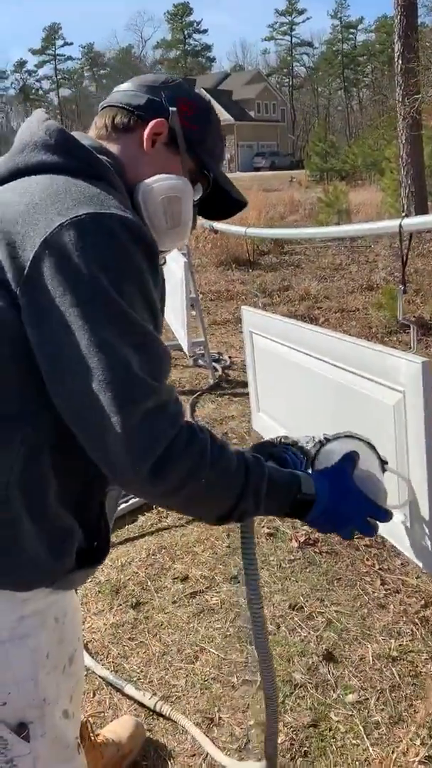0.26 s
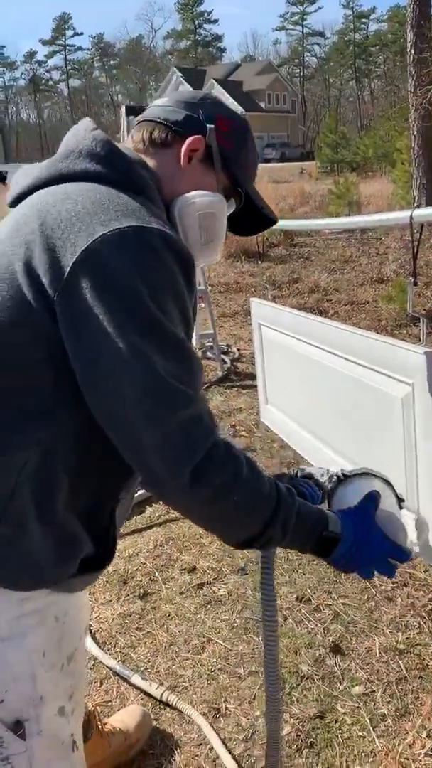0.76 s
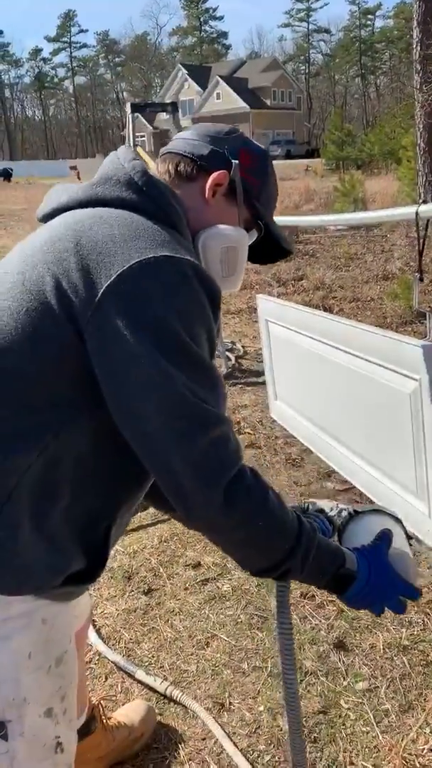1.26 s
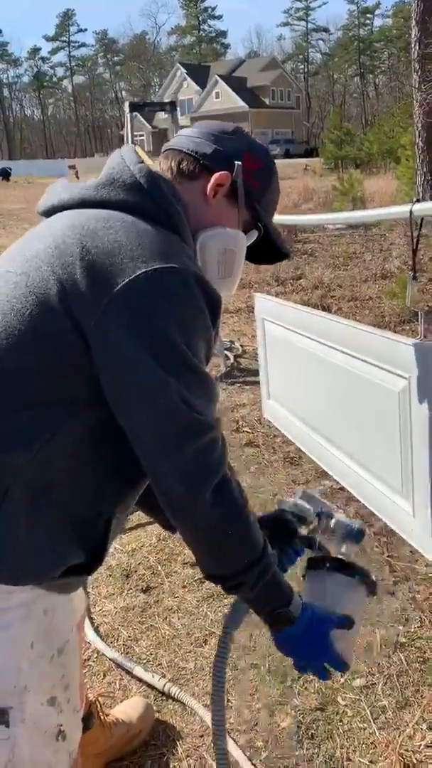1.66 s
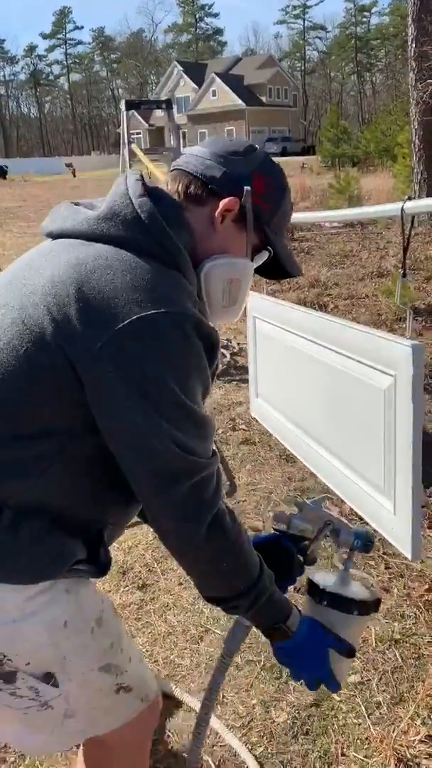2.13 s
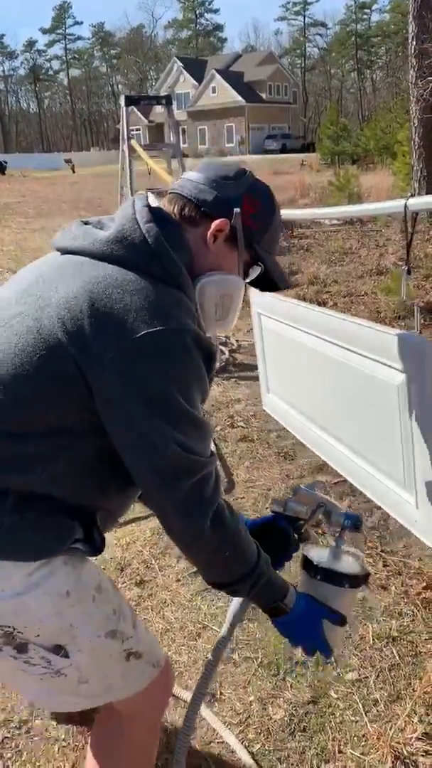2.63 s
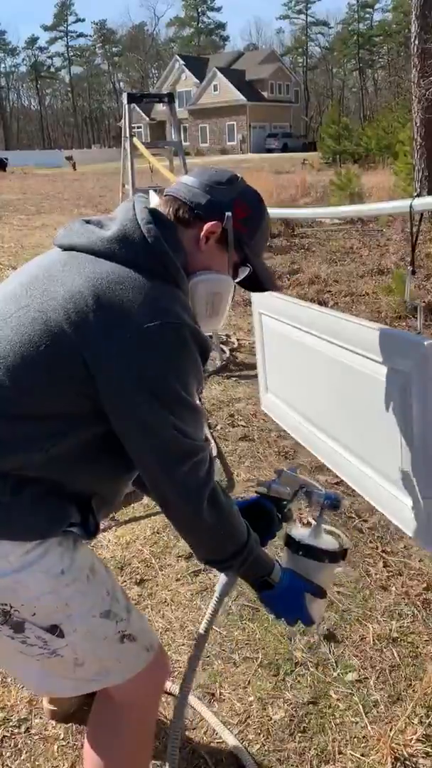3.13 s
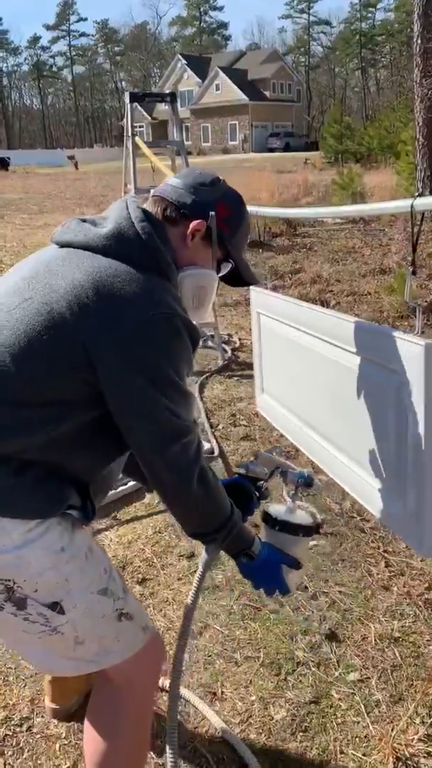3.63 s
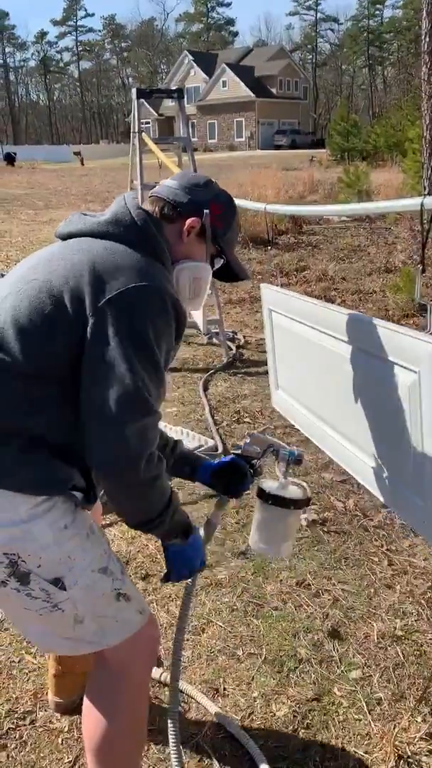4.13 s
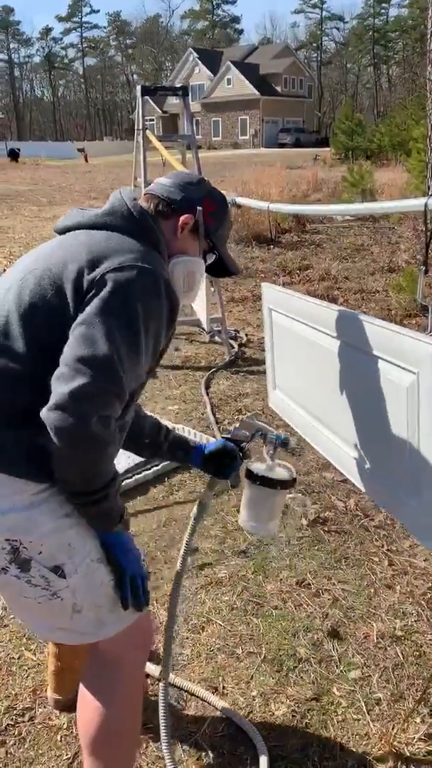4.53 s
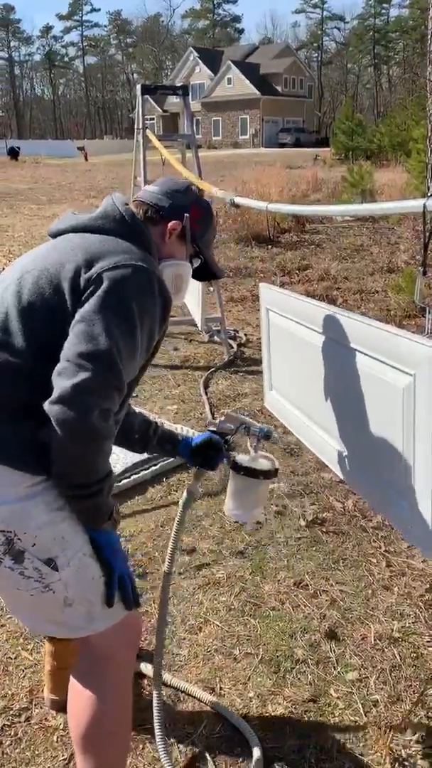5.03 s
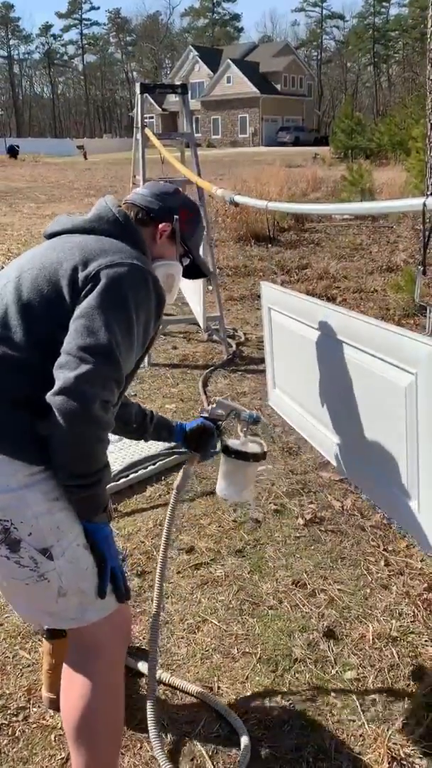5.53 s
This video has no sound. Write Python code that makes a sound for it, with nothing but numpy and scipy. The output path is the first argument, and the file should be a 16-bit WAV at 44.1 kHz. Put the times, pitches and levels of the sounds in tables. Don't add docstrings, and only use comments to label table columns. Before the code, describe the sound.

Outdoors, close to a two-port microphone, a hand-held paint sprayer hisses brightly over a turbine's steady mid-low whine and airy fan roar. The hiss slowly weakens, stops abruptly near 1.5 seconds, and the whine rises in pitch. About 0.6 seconds later the hiss bursts back with a tiny hoot, darker in tone, and the whine settles down again. Soft wind thumps throughout.

```python
import sys
import numpy as np
from scipy import signal
from scipy.fft import rfft, irfft
from scipy.io import wavfile
from scipy.ndimage import map_coordinates

SR = 44100
rng = np.random.default_rng(int(sys.argv[2]) if len(sys.argv) > 2 else 0)


def decibels_to_gain(level_db):
    exponent = np.asarray(level_db, float) / 20
    return 10 ** exponent


def store_pcm(level_fs):
    pcm = np.round(np.clip(level_fs, -1, 1) * 32767).astype(np.int16)
    wavfile.write(sys.argv[1], SR, np.atleast_2d(pcm).T)


N = 254898

# start in seconds, peak in dB, pitch in Hz.
BUFFETS = [
    (0.342, -44, 123),
    (0.681, -37, 45.8),
    (0.827, -51, 114),
    (1.367, -49, 91),
    (2.158, -38, 58),
    (2.473, -35, 122),
    (2.65, -35, 67.3),
    (3.101, -42, 72.7),
    (4.691, -34, 77),
]
# time in seconds, peak in dB, rise and fall in seconds.
GUSTS = [(0, -44, 0.067), (.13, -47, 0.055), (.5, -54, 0.32), (.71, -56, .04), (1.0, -49, 0.26),
         (1.24, -41, 0.095), (1.4, -38.5, 0.032), (1.51, -45.5, 0.042), (1.64, -48, 0.067),
         (1.92, -45.5, 0.11), (2.06, -44, 0.034), (2.19, -54, .07), (2.31, -41.5, .1), (2.41, -39, 0.032),
         (2.49, -36.5, .025), (2.68, -43, 0.067), (2.78, -45, 0.069), (3.03, -47, .06), (3.12, -43, 0.046),
         (3.43, -44.5, .18), (3.73, -50, .04), (3.94, -47, 0.024), (4.38, -47, .045), (4.72, -37, 0.023),
         (4.86, -44.5, 0.18), (5.0, -48, 0.044), (5.29, -46, .04), (5.43, -43, 0.05), (5.5, -48, 0.026)]

# frequency in Hz, lead in radians.
PORT_LEAD = [(20, 0.0), (450, .3), (680, 3.14), (900, 5.3), (1300, 6.1), (1950, 6.5), (2750, 9.25),
             (5000, 9.38), (5550, 9.65), (6400, 11.0), (7700, 12.3), (9500, 12.85), (10500, 14.1),
             (11600, 15.4), (13500, 16.0), (14200, 17.2), (15100, 18.6), (15800, 18.85)]
# frequency in Hz, likeness from 0 to 1.
PORT_LIKENESS = [(60, 0.78), (400, 0.84), (680, 0.63), (1500, 0.93), (2400, 0.91), (3300, 0.78), (4500, 1),
                 (5200, 0.96), (9000, 0.93), (16000, 1)]
# time in seconds, share 0-1.
PANEL_ECHO = [(0, 1), (.6, 0.74), (1.0, 0.55), (1.3, 0.27), (1.48, 0.26), (1.55, 0.3), (2.03, 0.3),
              (2.09, 0.1), (2.23, 0), (2.26, 0.18), (2.5, 0.14), (3.3, 0.26), (3.7, 0.43), (4.5, 0.51),
              (5.0, 0.49), (5.4, 0.55), (5.78, 0.6)]
# time in seconds, lifted Hz, cancelled Hz.
PANEL_COMB = [
    (0, 5900, 7360),
    (1.45, 6600, 6600),
    (2.1, 6940, 7250),
    (3.6, 6650, 7200),
    (4.2, 6160, 7740),
    (5.78, 6370, 6960),
]

# frequency in Hz, density in dB per Hz.
FAN_ROAR = [(30, -9), (60, -6), (150, -24), (320, -16.5), (480, -8), (660, -17.5), (1200, -16.5),
            (1650, -25.5), (2300, -22.5), (2650, -22.5), (2900, -21.5), (4300, -13), (4700, -25.5),
            (6900, -18.5), (15700, -36)]
# multiple of rotation, level in dB.
SHAFT_ORDERS = [
    (2, -17),
    (6, -29),
    (12, -27),
    (19, -30),
]
# time in seconds, level in dB.
SHAFT_LEVEL = [(0, -38.5), (.4, -40.5), (.8, -38), (1.2, -39.7), (1.42, -36.3), (1.56, -40), (1.66, -46.5),
               (1.99, -36.5), (2.17, -33.5), (2.35, -35.5), (2.5, -40.5), (2.89, -39), (3.15, -35.5),
               (3.4, -34.2), (3.75, -33.3), (4.55, -34), (5.78, -36)]

TRIGGER_S = [1.465, 1.485, 2.072, 2.098]
# time in seconds, hiss level in dB, aim at the microphone as treble lift in dB.
GUN = [(0.0, -25.5, 5), (0.16, -29, 8), (0.45, -30, 5.5), (0.75, -31, 5.5), (1.0, -32, 6), (1.26, -33, 4),
       (1.42, -34.5, 1.5), (2.1, -26.5, -3.5), (2.6, -26.5, -4), (2.95, -28.5, -3.5), (3.18, -27, -4),
       (3.4, -28, -4.5), (3.74, -26.5, -4), (3.95, -28, -3), (4.55, -28, -4.5), (4.74, -28.5, -1.5),
       (5.14, -29, -4), (5.77, -29, -2.5)]
HISS_CENTRES_HZ = [1950, 6260, 8440, 13200]
# dB at mean level, share of level,
# share of aim, dB at full panel echo.
HISS_ANSWER = [
    (-33, 0.39, -0.31, 4.5),
    (-29.5, 1.04, -0.085, -4),
    (-30.5, 1.04, -0.089, 0),
    (-29, 1.7, 1.05, -3),
]
# frequency in Hz, density in dB per Hz.
NOZZLE_COLOUR = [(100, -32), (250, -10.5), (420, -10), (640, -17), (1000, -9.5), (3800, -11.5),
                 (4300, -4.5), (5200, -7), (8000, -1), (11000, -1.5), (13000, 0.5), (14800, -3.5),
                 (15700, -3)]
# centre in Hz, width in Hz, lift in dB.
CAP_RESONANCES = [(474, 12, 7.5), (904, 100, 3), (2220, 550, 4.5), (3400, 410, 0), (5760, 570, 8),
                  (8600, 170, 2), (10850, 610, 2)]
# pitch in Hz, width in Hz, level in dB.
HOSE_NOTES = [
    (515.5, 41, -54),
    (952, 70, -53.5),
]
# start in seconds, pitch in Hz, peak in dB, length in seconds.
RESTART_HOOT = (2.11, 540, -39, .045)

LOADED_HZ = 351.7


def at_hz(points, hz):
    point_hz, value = np.array(points).T
    return np.interp(np.log(hz), np.log(point_hz), value)


def over_time(points, s):
    return np.interp(s, *np.transpose(points))


def rms_one(x):
    return x / np.sqrt(np.mean(x ** 2) + 1e-20)


def lag(x, seconds):
    r = np.exp(-1 / (seconds * SR))
    return signal.lfilter([1 - r], [1, -r], x)


def drift(shape, rate, step_s):
    r = np.exp(-2 * np.pi * rate * step_s)
    draw = rng.standard_normal(shape[:-1] + (shape[-1] + 500,))
    slow = signal.lfilter([1], [1, -2 * r, r * r], draw)
    return rms_one(slow[..., 500:])


def bump(hz, centre, width):
    return 1 / (1 + (2 * (hz - centre) / width) ** 2)


def patches(s, hz, width_hz, rate):
    knots = np.arange(0, SR / 2 + width_hz, width_hz)
    place = np.broadcast_arrays(hz / width_hz, np.arange(len(s)))
    return map_coordinates(drift((len(knots), len(s)), rate, s[1]), place, order=1)


def valve_open(t):
    return np.interp(t, TRIGGER_S, [1, 0, 0, 1])


def air_noise(level_db, scattered):
    frame = dict(nperseg=1024, noverlap=768)
    hz, s, white = signal.stft(rng.standard_normal((4, N)), SR, **frame)
    hz = np.maximum(hz, 10)[:, None]

    sway = 0.16 * patches(s, hz, 1200, 7.0) * np.clip(hz / 3000, 0, 1)
    lead = np.exp(0.5j * (np.interp(hz, *np.transpose(PORT_LEAD)) + sway))
    unlike = scattered * np.exp(-(np.log(hz / 2500) / 1.3) ** 2)
    alike = np.clip(at_hz(PORT_LIKENESS, hz) - unlike, 0, 1)
    echo_band = np.exp(-((hz - 4300) / 520) ** 2) + 0.46 * np.exp(-((hz - 3350) / 600) ** 4)
    echo = np.clip(over_time(PANEL_ECHO, s), 0, 1) * np.clip(echo_band, 0, 1)

    direct = np.sqrt(alike * (1 - echo)) * white[0] * np.stack([lead, lead.conj()])
    off_panel = np.sqrt(alike * echo) * white[1]
    all_round = np.sqrt(1 - alike) * white[2:]
    tilt = decibels_to_gain(5.3 * bump(hz, 830, 200) * [[[1]], [[-1]]])
    coloured = (direct + off_panel + all_round) * tilt * decibels_to_gain(level_db(s, hz))
    return signal.istft(coloured, SR, **frame)[1][:, :N]


def gusts(t, spread):
    power = decibels_to_gain(-72) ** 2
    for s, db, length in GUSTS:
        power = power + decibels_to_gain(db) ** 2 * np.exp(-2 * np.abs(t - s) / (spread * length))
    return np.sqrt(power)


def wind():
    t = np.arange(N) / SR
    s, level_db, _ = np.transpose(GUN)
    hose_roar = valve_open(t) * decibels_to_gain(np.interp(t, s, level_db) - 26.5)
    shared, own = rng.standard_normal((2, N))
    push_of_air = shared + 0.15 * own * [[1], [-1]]
    low = signal.sosfilt(signal.butter(3, [42, 105], "band", fs=SR, output="sos"), push_of_air)
    flutter = signal.sosfilt(signal.butter(2, [140, 300], "band", fs=SR, output="sos"), push_of_air)

    flutter_level = np.hypot(decibels_to_gain(-7) * gusts(t, 1.83), hose_roar)
    out = gusts(t, 0.98) * rms_one(low) + flutter_level * rms_one(flutter)
    age = np.arange(int(0.12 * SR)) / SR
    swell = (1 - np.exp(-age / 0.012)) * np.exp(-age / 0.054)
    for start, peak_db, hz in BUFFETS:
        push = swell * np.sin(2 * np.pi * hz * age * (1.3 - 4 * age))
        first = int(start * SR)
        out[:, first:first + len(age)] += decibels_to_gain(peak_db + 2.5) * push
    return out


def shaft_hz(s):
    inertia_s, hose_lag_s = 0.44, 0.06
    t = np.arange(N) / SR
    freed = lag(1 - valve_open(t - hose_lag_s), inertia_s)
    left_over = 3.4 * np.exp(-t / inertia_s)
    return np.interp(s, t, LOADED_HZ + 29.28 * freed + left_over)


def roar_db(s, hz):
    speed_up = shaft_hz(s) / LOADED_HZ - 1
    streaks = 2.2 * patches(s, hz, 300, 1.5)
    return at_hz(FAN_ROAR, hz) + 60.0 * speed_up * np.clip(hz / 5000, 0, 1) + streaks


def turbine():
    t = np.arange(N) / SR
    rotation = shaft_hz(t)
    phase = 2 * np.pi * np.cumsum(rotation) / SR
    steps = N // 400
    wobble_s = SHAFT_LEVEL[-1][0] * np.linspace(0, 1, steps)
    wobble = np.interp(t, wobble_s, drift((steps,), 12.0, 400 / SR))

    tone = decibels_to_gain(over_time(SHAFT_LEVEL, t) + 0.4 * wobble) * np.sqrt(2)
    whine = tone * np.sin(phase + [[0.15], [-0.15]]) * decibels_to_gain([[-0.6], [0.6]])
    speed_db = 97.0 * (rotation / LOADED_HZ - 1)
    for order, db in SHAFT_ORDERS:
        lead = np.interp(order * rotation[0], *np.transpose(PORT_LEAD)) * 0.37
        order_phase = order * phase + 0.11 * order * wobble
        whine += decibels_to_gain(-38.0 + db + 2.8 * wobble + speed_db) * np.sin(order_phase + [[lead], [-lead]])

    hum = decibels_to_gain(-54.5) * np.sqrt(2) * np.sin(2 * np.pi * 118.4 * t + 0.5 * wobble)
    roar = decibels_to_gain(-45.5) * rms_one(air_noise(roar_db, scattered=0.54))
    return whine + hum + roar


def hose():
    out = np.zeros(N)
    for hz, width, level_db in HOSE_NOTES:
        r = np.exp(-np.pi * width / SR)
        poles = [1, -2 * r * np.cos(2 * np.pi * hz / SR), r * r]
        note = signal.lfilter([1, 0, -1], poles, rng.standard_normal(N))
        out += decibels_to_gain(level_db) * rms_one(note)
    return out


def nozzle_db(s, hz):
    times, level_db, aim_db = np.transpose(GUN)
    mean_db, of_level, of_aim, of_echo = np.transpose(HISS_ANSWER)[:, :, None]
    level_move = np.interp(s, times, level_db) + 29
    bands = mean_db + of_level * level_move + of_aim * np.interp(s, times, aim_db)
    bands = bands + of_echo * over_time(PANEL_ECHO, s)
    spit = 4 * np.exp(-np.abs(s - TRIGGER_S[2]) / 0.019)
    eddies = 0.2 * drift((len(bands), len(s)), 6.8, s[1]) + 0.46 * drift((len(s),), 21.0, s[1])
    moves = bands + eddies + spit
    share = np.array([np.interp(hz[:, 0], HISS_CENTRES_HZ, row) for row in np.eye(len(bands))])

    rings = sum(db * bump(hz, centre, width) for centre, width, db in CAP_RESONANCES)
    times, lifted, cancelled = np.transpose(PANEL_COMB)
    comb = 5.4 * bump(hz, np.interp(s, times, lifted), 610)
    comb = comb - 2.8 * bump(hz, np.interp(s, times, cancelled), 520)
    mottle = 1.4 * patches(s, hz, 300, 2.0) + 1.0 * patches(s, hz, 700, 12.0)
    return share.T @ moves + at_hz(NOZZLE_COLOUR, hz) + rings + comb + mottle + 9.71


def nozzle():
    t = np.arange(N) / SR
    start, hz, peak_db, length = RESTART_HOOT
    swell = np.exp(-((t - start - length) / length) ** 2)
    hoot = decibels_to_gain(peak_db) * swell * np.sin(2 * np.pi * hz * t)
    flow = air_noise(nozzle_db, scattered=0.0) + hose()
    return valve_open(t) ** 0.92 * flow + hoot


def scene():
    return wind() + turbine() + nozzle()


def top_cut(x):
    return signal.sosfilt(signal.butter(12, 15950, fs=SR, output="sos"), x)


def record(dry):
    hz = np.fft.rfftfreq(N, 1 / SR)
    top = 15750
    corners = [10, 40, top - 30, top, top + 110, top + 150]
    response_db = np.interp(hz, corners, [-18, 0, 0, -25, -27, -70])
    mix = irfft(rfft(dry) * decibels_to_gain(response_db), N)
    return top_cut(mix)


dry = scene()
out = record(dry)
store_pcm(out)
```